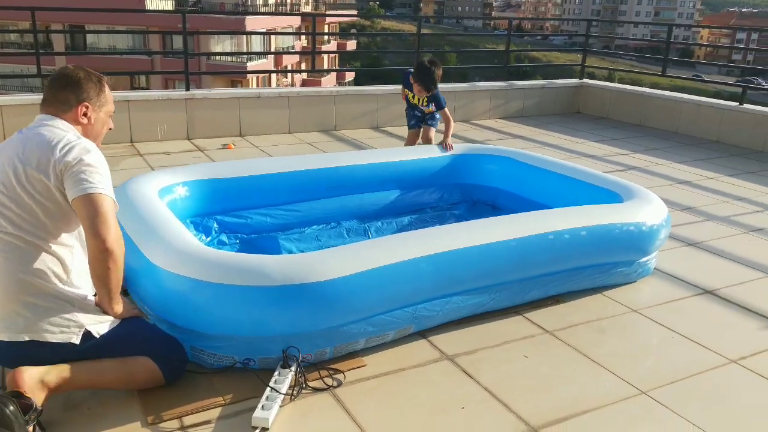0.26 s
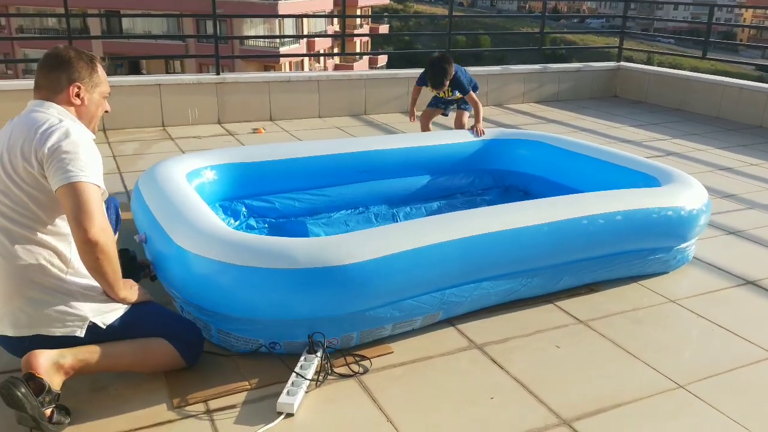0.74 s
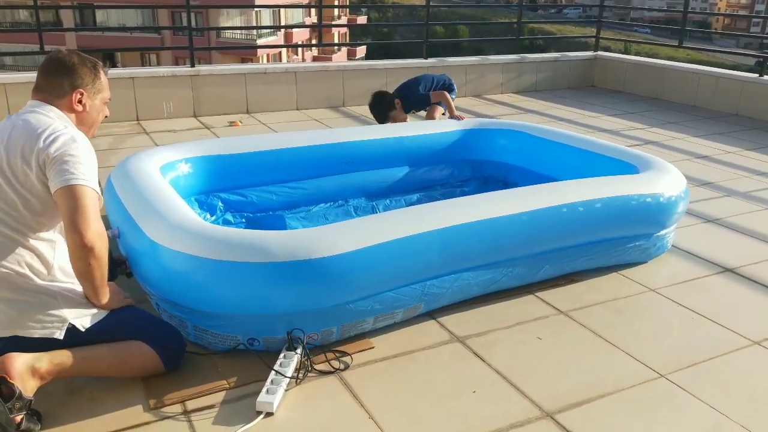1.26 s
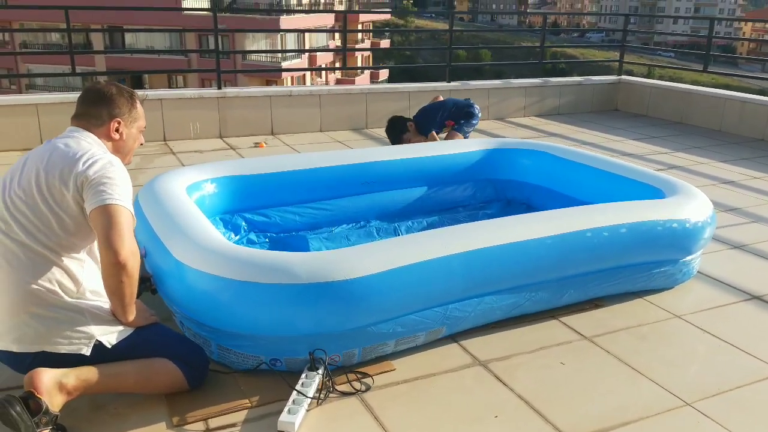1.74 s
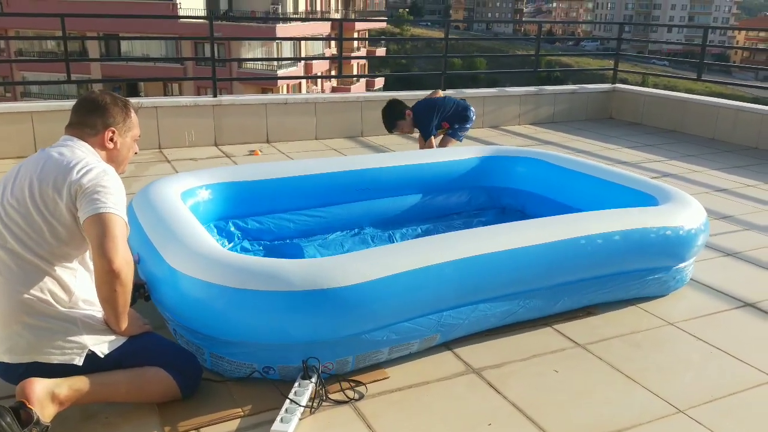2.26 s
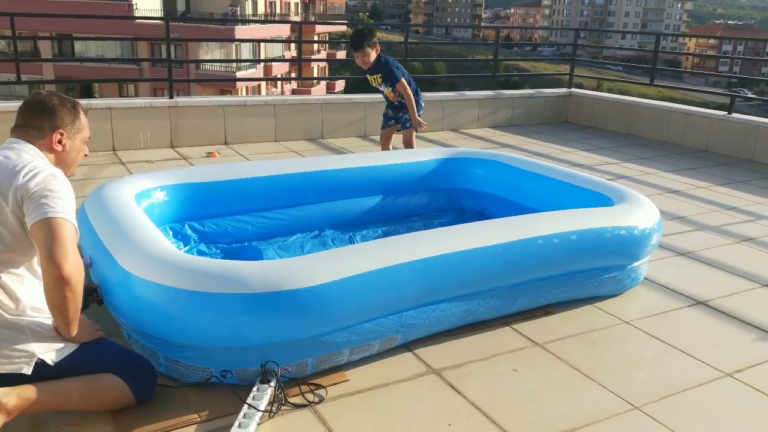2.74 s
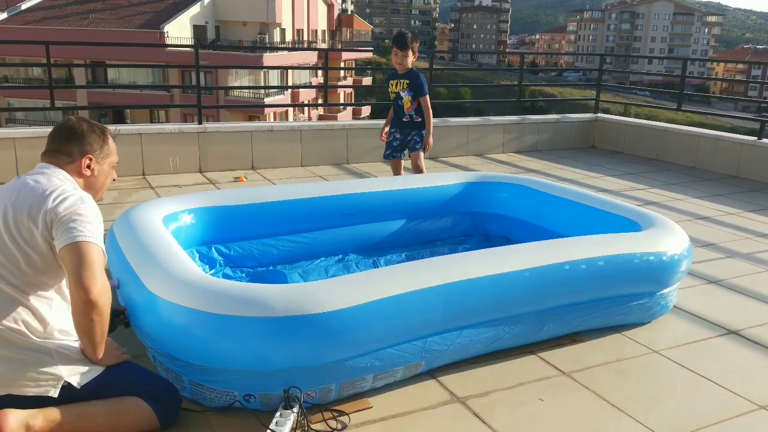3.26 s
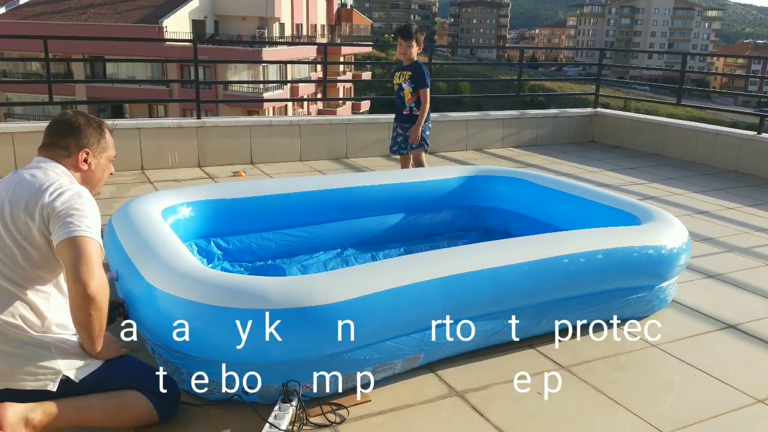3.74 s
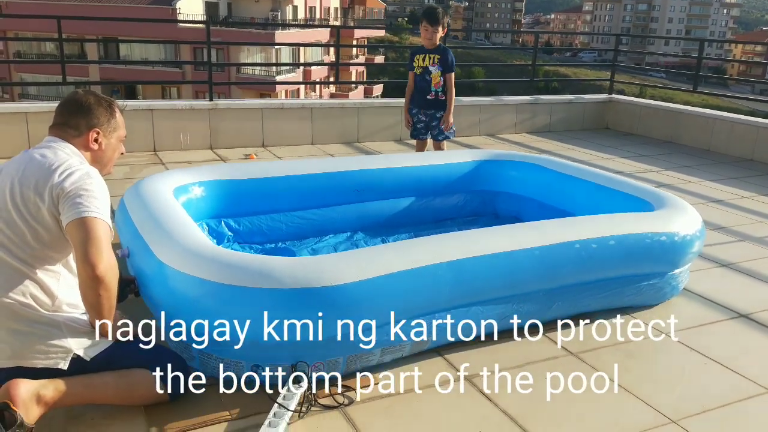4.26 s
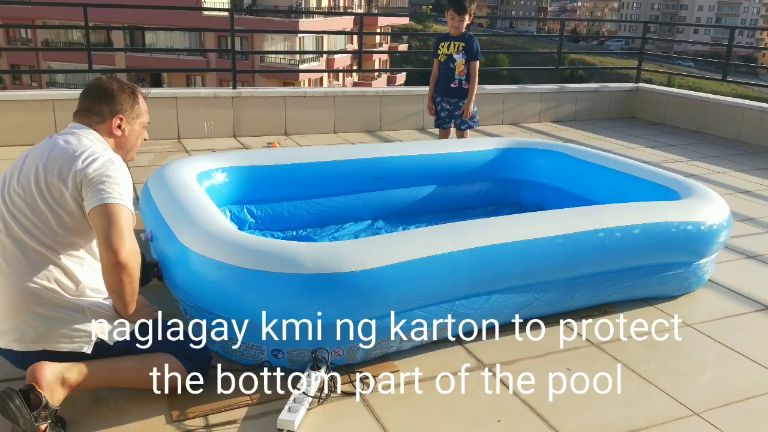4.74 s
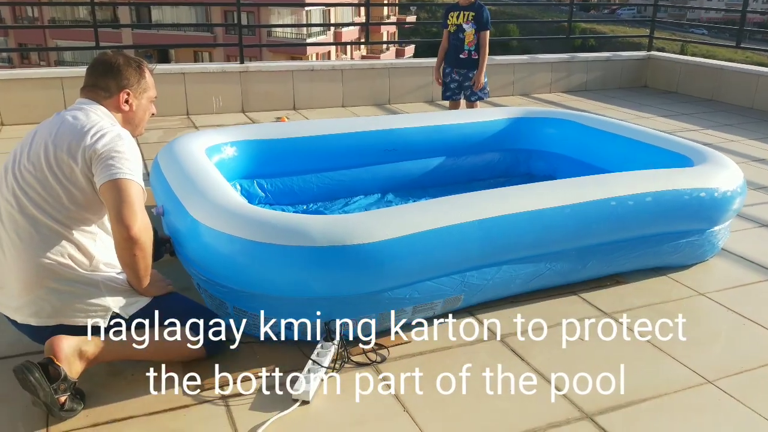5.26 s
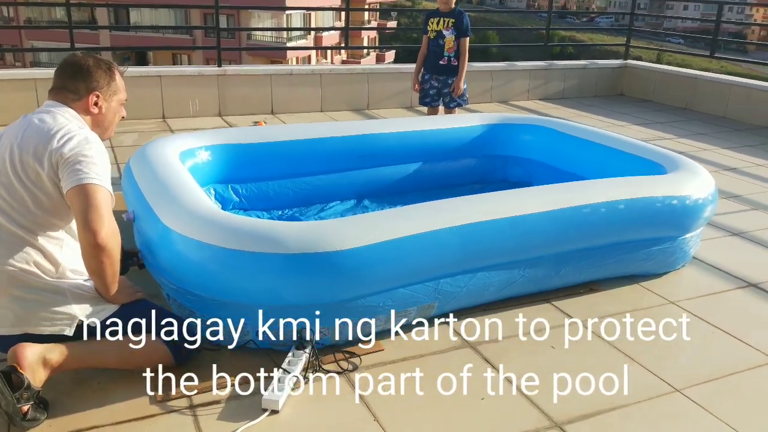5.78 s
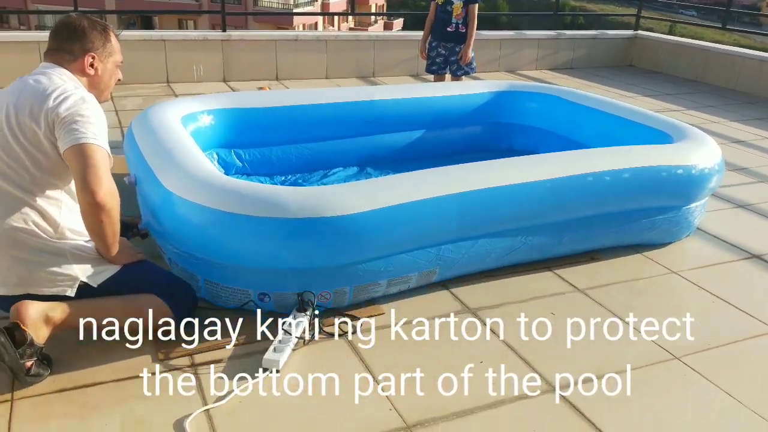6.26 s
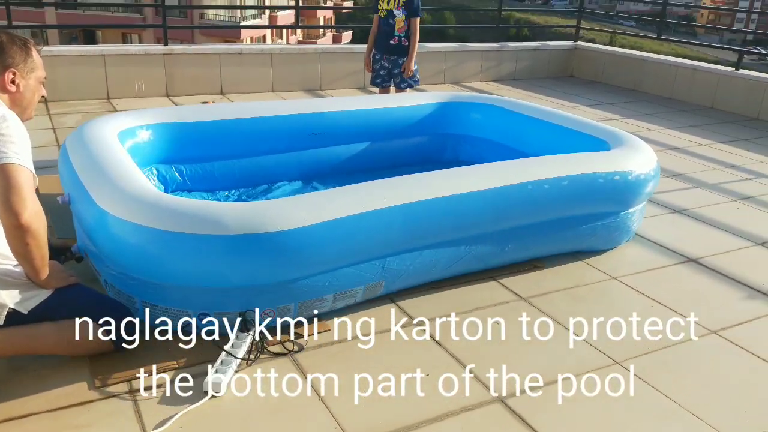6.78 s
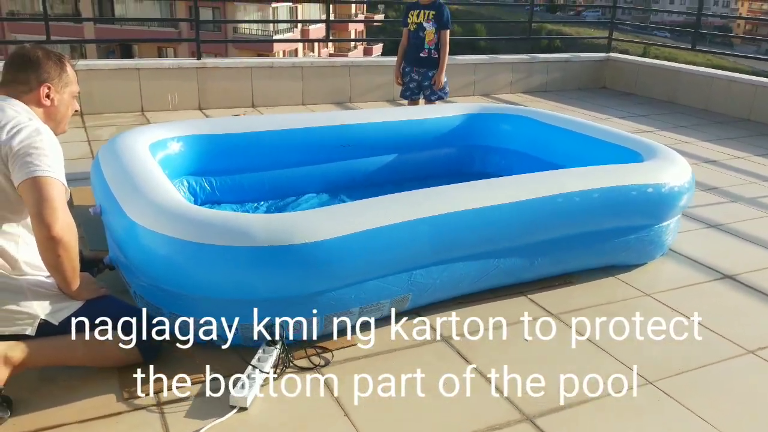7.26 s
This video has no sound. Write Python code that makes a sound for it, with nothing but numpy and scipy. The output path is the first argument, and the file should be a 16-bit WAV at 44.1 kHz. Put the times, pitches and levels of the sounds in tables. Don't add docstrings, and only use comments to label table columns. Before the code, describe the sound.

Close, continuous pump noise outdoors: humming motor, piercing blade whistle and turbulent airflow, the whistle shifting and fading between left and right as the hand-held phone sways. Dull finger taps occur around one second, followed by an abrupt left-only bump just before three. Near six seconds low traffic and hum rise while the lower airflow softens. The sound is slightly grainy, with dulled top treble.

```python
import sys
import numpy as np
from scipy import signal
from scipy.fft import rfft, irfft, next_fast_len
from scipy.io import wavfile
from scipy.ndimage import uniform_filter1d, map_coordinates

SR = 44100
rng = np.random.default_rng(int(sys.argv[2]) if len(sys.argv) > 2 else 0)


def attenuation_scalar(level_db):
    decades = np.asarray(level_db, float) / 20
    return 10 ** decades


def wav_out(sig):
    wavfile.write(sys.argv[1], SR, np.round(np.clip(np.atleast_2d(sig).T, -1, 1) * 32767).astype(np.int16))


N = 331632
SWELL_S, SWELL_RISE_S = 5.8, 0.13


def unit(x):
    return x / np.sqrt(np.mean(x ** 2) + 1e-20)


def along(points, hz):
    f, v = np.transpose(points)
    return np.interp(np.log(hz + 1), np.log(f + 1), v)


def curves(rows):
    s, *cols = np.transpose(rows)
    return [np.interp(np.arange(N) / SR, s, c) for c in cols]


def wobble(rate):
    knots = rng.standard_normal(int(N * rate / SR) + 4)
    return map_coordinates(knots, [np.arange(N) * rate / SR])


def rise(at_s, rise_s):
    return (1 + np.tanh((np.arange(N) / SR - at_s) / rise_s)) / 2


def filtered(x, response):
    m = next_fast_len(N + 8192)
    return irfft(rfft(x, m) * response(np.fft.rfftfreq(m, 1 / SR)), m)[..., :N]


def resonances(modes):
    def gain(f):
        power = 0
        for centre, width, db in modes:
            detuning = (centre ** 2 - f * f) / (f * width + 1)
            power = power + attenuation_scalar(2 * db) / (1 + detuning ** 2) ** 1.9
        return np.sqrt(power)
    return gain


# pitch_hz, likeness (0 to 1)
PORT_LIKENESS = [(60, 1), (300, 0.93), (700, 0.27), (1300, 0.38), (2200, 0.38), (2800, 0.083), (6000, 0.11),
                 (12000, 0.2)]


def rush(colour, patchy_db):
    z = signal.stft(rng.standard_normal((2, N)), nperseg=512)[2]
    field = uniform_filter1d(rng.standard_normal(z.shape[1:]), size=2, axis=0)
    field = unit(uniform_filter1d(field, size=16, axis=1))
    field = field - field ** 2 / 2
    pair = signal.istft(z * attenuation_scalar(patchy_db * field), nperseg=512)[1][:, :N]

    def mid_side(hz):
        turn = np.arccos(np.clip(along(PORT_LIKENESS, hz), 0, 1)) / 2
        return colour(hz) * np.array([np.cos(turn), np.sin(turn)])

    mid, side = filtered(pair, mid_side)
    lag_s = 7.5 / SR
    late = lambda hz: np.exp(1j * np.pi * hz * lag_s * np.array([[-1], [1]]))
    return unit(filtered(np.array([mid + side, mid - side]), late))


# multiple of shaft speed, level_db re the hum
SHAFT_ORDERS = [(2, -12), (3, -11), (5, -9), (11, -72), (12, -18.5)]


def shaft_hum(turns):
    hum = attenuation_scalar(0.3 * wobble(6)) * np.sin(turns)
    for order, db in SHAFT_ORDERS:
        hum = hum + attenuation_scalar(db + 3 * wobble(4)) * np.sin(round(order) * turns + 1.6 * wobble(6))
    sag_db_per_s, step_db = -0.77, 3
    hum_db = -47 + sag_db_per_s * np.arange(N) / SR + step_db * rise(SWELL_S, SWELL_RISE_S)
    return attenuation_scalar(hum_db + np.array([[3.5], [.4]])) * hum


def lobes(ports, order):
    t = np.arange(0, N + 256, 256) / SR
    wave_mm = 343000 / (order * np.mean(SHAFT_SPEED, axis=0)[1])
    gains = []
    for rows in ports:
        gain = 0
        for s, half_s, db, path_mm in rows:
            gain = gain + attenuation_scalar(db) * np.exp(-((t - s) / half_s) ** 2 - 2j * np.pi * path_mm / wave_mm)
        gains.append(np.interp(np.arange(N) / SR, t, gain))
    return np.array(gains)


# centre_s, half_length_s, level_db, path_past_whole_waves_mm
WHISTLE_LEFT = [(0.05, 0.09, -34.1, 36), (0.6, 0.26, -30.2, 94), (0.66, 0.18, -28.5, 82),
                (1.07, 0.23, -25.5, 82), (1.37, 0.11, -37.8, 89), (1.64, 0.15, -27.5, 78),
                (1.84, 0.1, -23.8, 94), (2.27, 0.15, -32.5, 81), (2.36, 0.16, -30.8, 37),
                (2.59, 0.11, -43.0, 57), (2.89, 0.26, -29.8, 69), (3.21, 0.05, -41.7, 84),
                (3.46, 0.18, -32.9, 59), (3.79, 0.27, -34.2, 52), (4.15, 0.21, -38.4, 23),
                (4.4, 0.13, -37.9, 81), (4.5, 0.16, -39.6, 53), (4.92, 0.3, -26.8, 67),
                (5.42, 0.12, -31.4, 63), (5.44, 0.05, -32.7, 27), (5.81, 0.37, -33.7, 102),
                (6.04, 0.16, -31.5, 32), (6.3, 0.15, -30.3, 7), (6.59, 0.14, -34.6, 15),
                (6.99, 0.25, -34.0, 3), (7.18, 0.27, -35.3, 54), (7.44, 0.1, -31.8, 53)]
WHISTLE_RIGHT = [(0.15, 0.26, -29.2, 93), (0.47, 0.1, -34.4, 26), (0.71, 0.1, -32.1, 57),
                 (0.81, 0.16, -42.7, 89), (1.09, 0.15, -28.1, 35), (1.34, 0.15, -32.4, 30),
                 (1.77, 0.17, -28.2, 42), (2.05, 0.17, -28.6, 71), (2.36, 0.08, -29.9, 83),
                 (2.55, 0.1, -30.6, 77), (2.76, 0.18, -29.5, 73), (3.22, 0.18, -33.7, 79),
                 (3.53, 0.12, -39.0, 75), (3.74, 0.19, -34.5, 106), (4.02, 0.17, -35.0, 98),
                 (4.07, 0.1, -37.5, 21), (4.48, 0.18, -34.7, 23), (4.79, 0.29, -45.0, 89),
                 (5.04, 0.07, -33.4, 65), (5.05, 0.12, -32.0, 24), (5.6, 0.32, -32.7, 100),
                 (6.09, 0.2, -26.8, 84), (6.37, 0.12, -35.9, 87), (6.77, 0.12, -35.9, 61),
                 (6.89, 0.15, -35.0, 3), (7.32, 0.2, -38.2, 22), (7.46, 0.21, -38.2, 92)]
# centre_s, half_length_s, level_db, path_past_whole_waves_mm
OVERTONE_LEFT = [(0.17, 0.5, -51.1, 15), (0.43, 0.21, -49.5, 42), (1.04, 0.12, -55.2, 54),
                 (1.89, 0.5, -55.7, 4), (2.31, 0.11, -50.6, 47), (2.6, 0.36, -53.3, 48),
                 (3.24, 0.2, -50.0, 27), (3.64, 0.43, -52.1, 5), (4.31, 0.22, -47.7, 49),
                 (4.98, 0.5, -48.4, 43), (5.11, 0.34, -44.9, 17), (5.67, 0.5, -53.0, 2),
                 (6.17, 0.15, -50.0, 48), (7.21, 0.34, -47.0, 4), (7.34, 0.13, -47.8, 31)]
OVERTONE_RIGHT = [(0.16, 0.05, -52.6, 21), (0.53, 0.5, -52.3, 43), (0.97, 0.15, -50.6, 41),
                  (1.56, 0.1, -55.1, 13), (2.22, 0.09, -50.4, 29), (2.81, 0.16, -54.4, 2),
                  (2.89, 0.5, -55.4, 27), (3.54, 0.27, -49.4, 27), (4.32, 0.45, -48.6, 22),
                  (5.08, 0.33, -41.5, 11), (5.68, 0.16, -44.8, 51), (5.69, 0.32, -50.8, 35),
                  (6.63, 0.24, -49.2, 32), (7.07, 0.21, -42.6, 46), (7.52, 0.35, -45.1, 34)]


def blade_whistle(turns):
    flutter = np.array([wobble(30), wobble(30)])
    gusts = 0.1 * np.array([wobble(220), wobble(220)])
    whistle = lobes([WHISTLE_LEFT, WHISTLE_RIGHT], order=10) * np.exp(1j * (10 * turns + gusts))
    overtone = lobes([OVERTONE_LEFT, OVERTONE_RIGHT], order=20) * np.exp(20j * turns)
    return attenuation_scalar(0.92 + 0.74 * flutter) * whistle.real + attenuation_scalar(2.3 * flutter + 1.3) * overtone.real


# time_s, pitch_hz
SHAFT_SPEED = [(0.0, 317.94), (0.75, 318.73), (1.5, 318.66), (2.26, 318.34), (3.01, 318.49), (3.76, 318.65),
               (4.51, 318.97), (5.26, 319.08), (6.02, 319.36), (6.77, 319.4), (7.52, 319.28)]


def impeller():
    turns = 2 * np.pi * np.cumsum(curves(SHAFT_SPEED)[0] + 0.246 * wobble(25)) / SR
    return np.sqrt(2) * (blade_whistle(turns) + shaft_hum(turns))


# time_s, nozzle_level_db
OUTLET_AIM = [(0, -37), (.5, -40), (1.1, -38), (2, -38.4), (2.7, -35), (3.6, -38), (4.2, -36.5),
              (4.8, -35.5), (5.2, -36), (5.65, -35), (6, -38.5), (7.2, -41), (7.52, -39.5)]
# pitch_hz, width_hz, level_db
VOLUTE_MODES = [(441, 10, -9), (713, 38, -4.5), (905, 180, -8.5), (1266, 350, -7.5), (1483, 294, -1.5)]
# pitch_hz, width_hz, level_db
NOZZLE_MODES = [(2084, 450, -2), (2217, 52, 2.5), (2682, 92, -9)]
# pitch_hz, density_db (per Hz)
HOSE_COLOUR = [(25, -24), (60, -9), (250, -8.5), (500, -8), (700, -7.5), (1050, -7), (1800, -1),
               (2500, -7.5), (2850, -2), (3000, -4.5), (3400, -35)]
# pitch_hz, density_db (per Hz)
JET_COLOUR = [(2900, -31.5), (3400, -14), (3800, -5), (4400, -6.5), (5000, -3.5), (5870, 2), (6300, -2),
              (6700, -4.5), (7200, -17.5), (8200, -27), (9750, -23), (10700, -34.5), (11300, -32),
              (13000, -27.5)]


def airflow():
    nozzle_db, = curves(OUTLET_AIM)
    follows, choke_db = 0.33, -5
    volute_db = -38.5 + follows * (nozzle_db - nozzle_db.mean()) + choke_db * rise(6.3, 0.31)
    volute = attenuation_scalar(volute_db - 0.9) * rush(resonances(VOLUTE_MODES), patchy_db=1.5)
    nozzle = attenuation_scalar(nozzle_db + 0.9) * rush(resonances(NOZZLE_MODES), patchy_db=1.0)
    hose = attenuation_scalar(-43 + 3.0) * rush(lambda hz: attenuation_scalar(along(HOSE_COLOUR, hz)), patchy_db=3.0)
    jet = attenuation_scalar(-44 + 2.0) * rush(lambda hz: attenuation_scalar(along(JET_COLOUR, hz)), patchy_db=3.5)
    drift_db = .3
    return volute + nozzle + attenuation_scalar(drift_db * wobble(2.8)) * hose + attenuation_scalar(drift_db * wobble(1.9)) * jet


# pitch_hz, density_db (per Hz)
TRAFFIC_COLOUR = [(15, -53), (25, -33), (102, -8.5), (270, -8.5), (317, -6), (382, -20), (600, -19),
                  (780, -35.5), (1320, -120)]


def town():
    port_db = np.array([[1.5], [-1.5]])
    level_db = -55.5 + 6.5 * rise(SWELL_S, SWELL_RISE_S) + 1.4 * wobble(2.0) + port_db
    return attenuation_scalar(level_db) * rush(lambda hz: attenuation_scalar(along(TRAFFIC_COLOUR, hz)), patchy_db=1.5)


# start_s, level_db (peak), pitch_hz, t60_s, left_over_right_db
KNOCKS = [
    (0.768, -31, 187, 0.063, 0),
    (1.201, -26, 328, 0.024, 0),
    (1.2002, -27, 587, 0.015, -5),
    (1.261, -38.5, 151, 0.16, -2),
    (2.884, -18.5, 88, 0.08, 25),
    (2.95, -38.5, 98, 1.2, 30),
    (3.31, -47, 96, 0.57, 2),
    (5.391, -45, 101, 0.39, -1),
]


def knocks():
    out, t = np.zeros((2, N + SR)), np.arange(SR) / SR
    for s, db, hz, t60, pan_db in KNOCKS:
        ring = attenuation_scalar(db - 60 * t / t60) * (1 - np.exp(-t * hz * 3)) * np.sin(2 * np.pi * hz * t)
        start = round(s * SR)
        out[:, start:start + SR] += attenuation_scalar([[0], [-pan_db]]) * ring
    return out[:, :N]


def finger_bump():
    u = np.arange(N) / SR - 2.8729
    press = -np.clip(1 + u / .0052, 0, 1.05) + .15 * np.exp(-((u + 0.0056) / .002) ** 2)
    release = 1.1 * np.exp(-np.abs(u) / 0.0045)
    release = release - .27 * np.exp(-np.abs(u) / .012) * np.minimum(u / 0.0022, 1)
    snap = (1 + np.tanh(u / .00011)) / 2
    left = attenuation_scalar(-10.5) * (press * (1 - snap) + release * snap)
    return np.array([left, np.zeros(N)])


def scene():
    return impeller() + airflow() + town() + knocks() + finger_bump()


# pitch_hz, level_db (at the whistle's pitch)
CLOCK_RIPPLE = [(3889.76, -25), (7779.52, -29), (11669.3, -32), (15559, -35), (11574, -43), (15464, -43)]


def uneven_clock(x):
    t = np.arange(N) / SR
    ripple = sum(2 * attenuation_scalar(db) * np.sin(2 * np.pi * hz * t) for hz, db in CLOCK_RIPPLE)
    slope = filtered(x, lambda hz: 1j * hz / 3190)
    return x + attenuation_scalar(.3) * ripple * slope


# pitch_hz, step_db
ROUNDING_STEPS = [(100, -62), (400, -54), (900, -45), (1400, -40), (2400, -38), (3000, -36), (3600, -39),
                  (4300, -37.5), (5500, -40.5), (6500, -39), (7200, -41), (7900, -47.5), (10000, -47),
                  (11300, -50), (12700, -48)]
BAND_EDGES = np.r_[0:40:4, 40:96:8, 96:144:12, 144:176:16, 176:216:20, 216:264:24, 264:320:28, 320:1024:32]
# bands_up, step_db (re the band)
NEIGHBOUR_MASK = [(-1, -31), (0, -24), (1, -27.5), (2, -35)]


def phone_rounding(x, busy_db, masking):
    hop, offset = 1024, 270
    n, k = np.arange(2 * hop)[:, None], np.arange(hop)
    basis = np.cos(np.pi / hop * (n + .5 + hop / 2) * (k + .5)) * np.sqrt(2 / hop)
    basis = basis * signal.windows.kaiser_bessel_derived(2 * hop, 4 * np.pi)[:, None]
    pair = np.pad([x[0] + x[1], x[0] - x[1]], ((0, 0), (2 * hop - offset, 3 * hop))) / 2
    hops = pair[:, :(N // hop + 4) * hop].reshape(2, -1, hop)
    c = np.concatenate([hops[:, :-1], hops[:, 1:]], axis=2) @ basis
    width = np.diff(np.r_[BAND_EDGES, hop])
    hz = (BAND_EDGES + width / 2) * SR / 2 / hop

    mid_power, side_power = np.sum(c[0] ** 2 + 1e-9, axis=1), np.sum(c[1] ** 2, axis=1)
    side_db = 10 * np.log10(side_power / mid_power + 1e-9)[:, None] - 1
    count = len(side_db)
    busy = unit(uniform_filter1d(rng.standard_normal((count, len(hz))), size=4, axis=0))
    sway = wobble(8)[::hop][np.arange(count) % (N // hop), None]
    treble_db = (masking * side_db + busy_db / 2 * sway) * np.clip(hz / 8000, 0, 1)
    step_db = along(ROUNDING_STEPS, hz) + busy_db * busy + treble_db

    ports = c[0] + [[[1]], [[-1]]] * c[1]
    band = np.sqrt(np.add.reduceat(ports ** 2, BAND_EDGES, axis=2).min(axis=0))
    masks = [attenuation_scalar(db) * np.roll(band, up, axis=1) for up, db in NEIGHBOUR_MASK]
    step = np.max([attenuation_scalar(step_db)] + masks, axis=0)

    faint = np.maximum.reduceat(np.abs(c), BAND_EDGES, axis=2) < 1.05 * step
    c, step = c * np.repeat(~faint, width, axis=2), np.repeat(step, width, axis=1)
    rounded = np.sign(c) * np.floor((np.abs(c) / step) ** .75 + .4054) ** (4 / 3) * step
    frames = rounded @ basis.T
    joined = (frames[:, 1:, :hop] + frames[:, :-1, hop:]).reshape(2, -1)
    mid, side = joined[:, hop - offset:][:, :N]
    return np.array([mid + side, mid - side])


def top_cut(x):
    return signal.sosfilt(signal.butter(12, 13060, fs=SR, output="sos"), x)


def record(dry):
    mix = phone_rounding(uneven_clock(dry), busy_db=1.8, masking=.4)
    return top_cut(mix)


dry = scene()
out = record(dry)
wav_out(out)
```